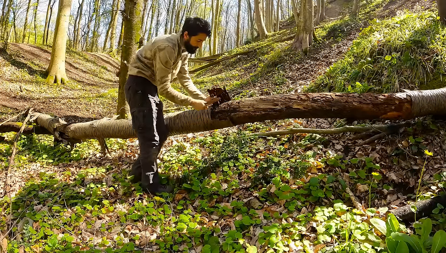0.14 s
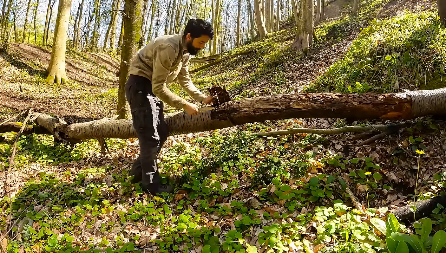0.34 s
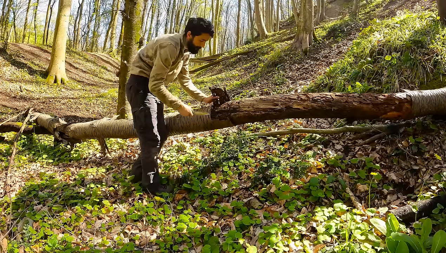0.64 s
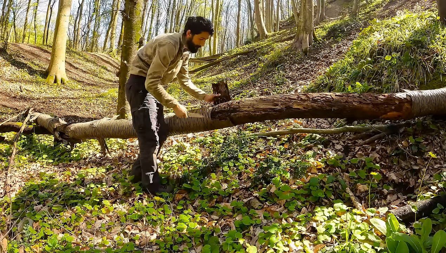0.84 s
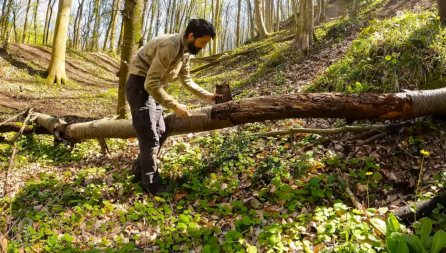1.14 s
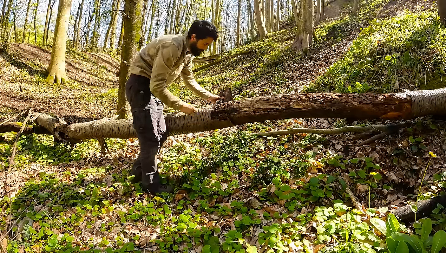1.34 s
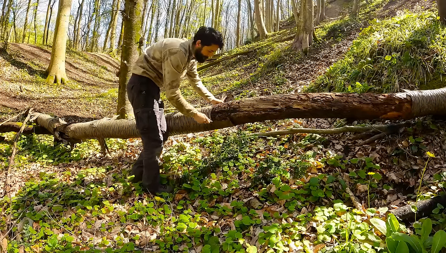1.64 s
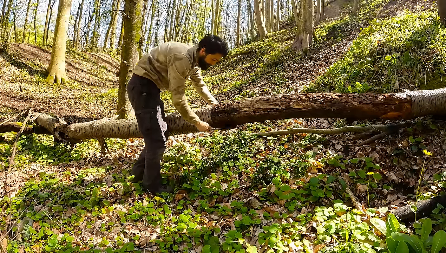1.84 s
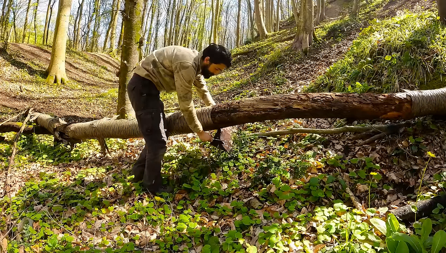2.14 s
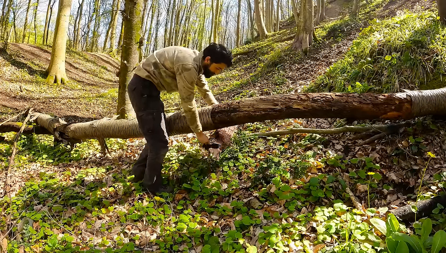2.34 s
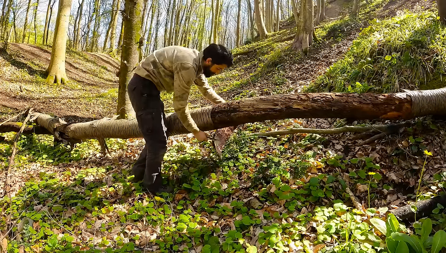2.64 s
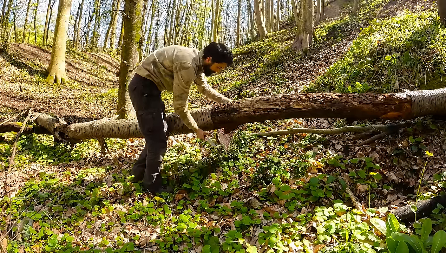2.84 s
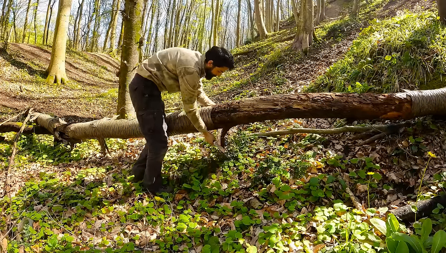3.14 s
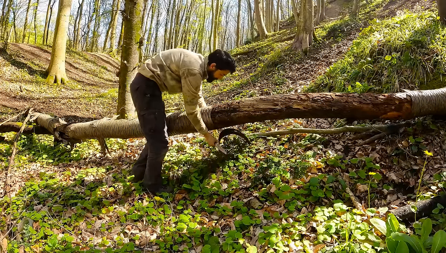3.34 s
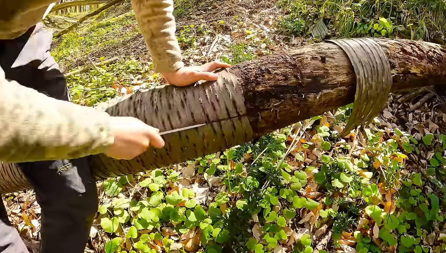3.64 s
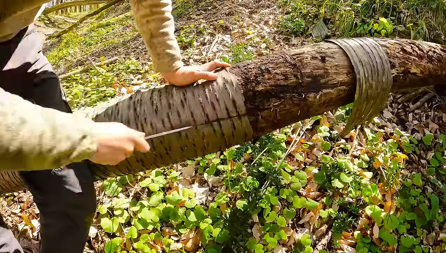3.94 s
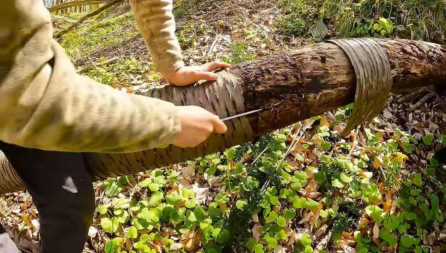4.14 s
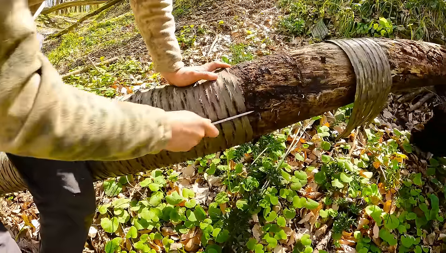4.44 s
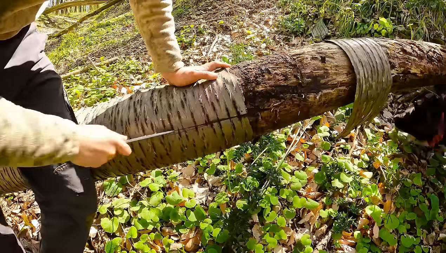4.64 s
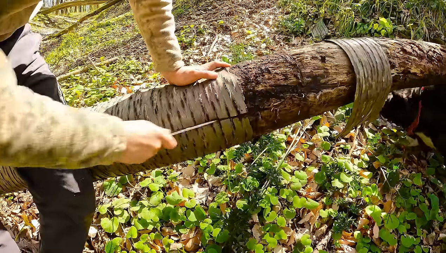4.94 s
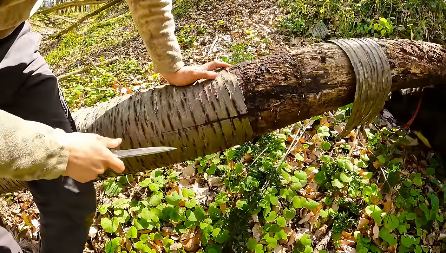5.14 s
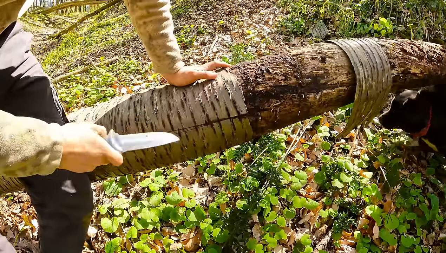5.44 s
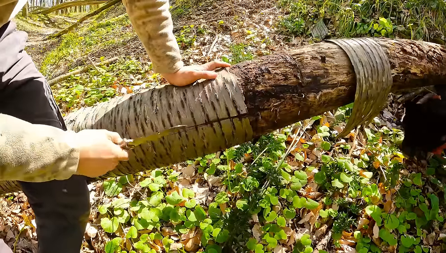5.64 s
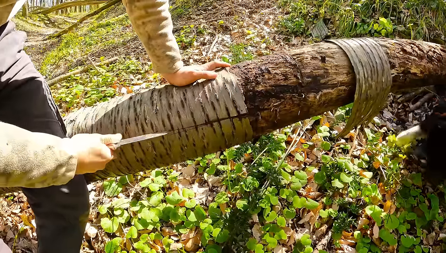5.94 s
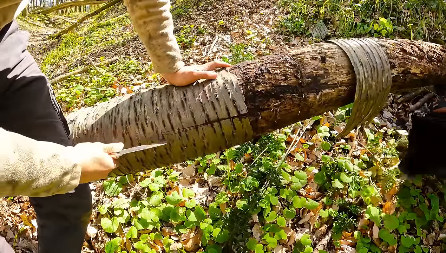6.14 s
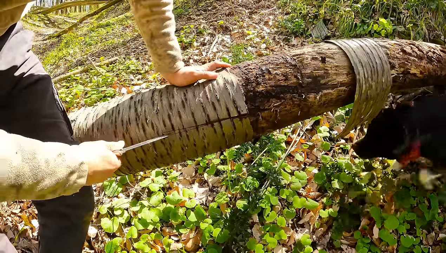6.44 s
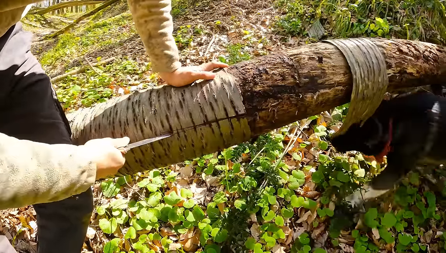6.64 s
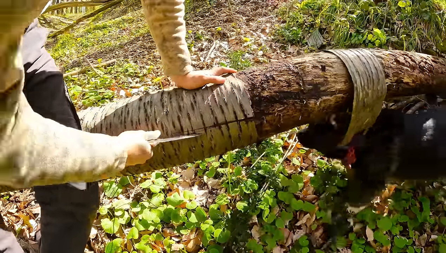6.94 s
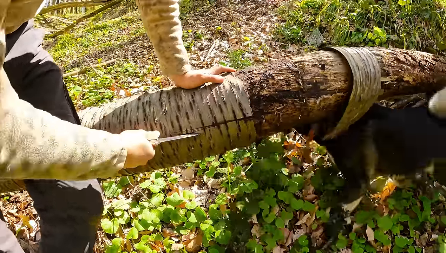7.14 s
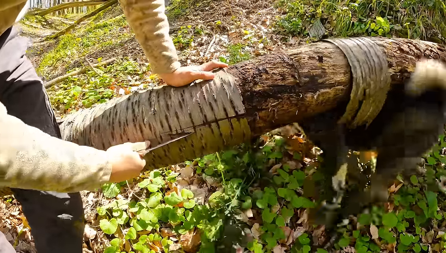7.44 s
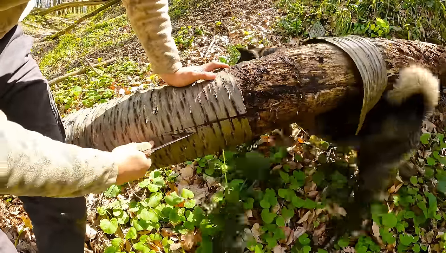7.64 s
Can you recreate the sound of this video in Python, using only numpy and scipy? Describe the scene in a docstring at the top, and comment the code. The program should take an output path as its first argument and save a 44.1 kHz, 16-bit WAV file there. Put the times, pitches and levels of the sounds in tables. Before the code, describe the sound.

In a quiet forest with faint air and a thin distant bird, a sheet of bark is peeled from a log in small tearing tugs, dry snaps and crumbly ticks. A knife then scores it with quick, close rasping strokes and sharp cracks. After a brief pause a dog trots through dry leaves, breaking twigs, bumps heavily beside the microphone, mostly on the right, and brushes softly under the log.

```python
"""In a quiet forest, a man peels a sheet of bark off a fallen log, then scores it with short knife strokes.
Tearing and rasping are clouds of tiny ringing fractures shaped by effort; snaps are sharp fronts with short rings.
A small bird sings faintly in gliding sine notes over a filtered-noise murmur of air.
A dog trots up through leaves of crushed grains and breaks twigs, bumps heavily near the microphone
and brushes under the log; low noise bands make the thuds and decaying sines the hard bumps."""
import sys
import numpy as np
from scipy import signal
from scipy.fft import rfft, irfft
from scipy.io import wavfile
from scipy.ndimage import map_coordinates

SR = 44100
rng = np.random.default_rng(int(sys.argv[2]) if len(sys.argv) > 2 else 0)


def unload_wav(signal):
    """Save mono or channel-first audio to the path in sys.argv[1] as 16-bit WAV at rate SR, clipped to [-1, 1]."""
    wavfile.write(
        sys.argv[1],
        SR,
        np.round(np.clip(np.atleast_2d(signal).T, -1, 1) * 32767).astype(np.int16),
    )


N = 343968

# leaves stirred as the dog comes nearer: (time [s], crunch [dB], fizz [dB])
LEAF_STIR = [(5.2, -74, -92), (5.5, -68.5, -69.5), (5.77, -61, -76), (5.92, -50.5, -71), (6.0, -55, -56),
             (6.1, -45.5, -48), (6.35, -42, -42.5), (6.47, -48, -50.5), (6.85, -39, -43.5),
             (7.02, -39, -44.5), (7.13, -52.5, -63), (7.4, -73, -48)]
# the dog brushing under the log: (time [s], crunch [dB], fizz [dB])
COAT_BRUSH = [(7.198, -51, -72), (7.32, -40.5, -57), (7.42, -35.5, -46.5), (7.48, -40.5, -55),
              (7.572, -35, -51), (7.66, -47, -60), (7.71, -41, -54), (7.8, -43, -59)]


def from_db(db):
    """Decibels to gain."""
    return 10 ** (np.asarray(db) / 20)


def unit(x):
    """Scales to rms 1."""
    return x / np.sqrt(np.mean(x ** 2) + 1e-20)


def read(points, hz):
    """Reads a table on a log-frequency axis."""
    f, value = np.transpose(points)
    return np.interp(np.log(hz + 1), np.log(f + 1), value)


def level_curve(s, db):
    """Gain over the whole scene from levels in dB at times s, all but silent outside them."""
    return from_db(np.interp(np.arange(N) / SR, s, db, -120, -120))


def add(mix, s, sound):
    """Adds a sound to the mix at time s."""
    part = mix[..., max(round(s * SR), 0):][..., :sound.shape[-1]]
    part += sound[..., :part.shape[-1]]


def band(x, lo_hz, hi_hz, order=2):
    """Causal band-pass."""
    edges = np.clip([lo_hz, max(hi_hz, lo_hz * 1.1)], 5, SR / 2 - 100)
    return signal.sosfilt(signal.butter(order, edges, "band", fs=SR, output="sos"), x)


def colour(x, tone):
    """Minimum-phase filter with the given spectrum, so that clicks keep their sharp fronts."""
    hz = abs(np.fft.fftfreq(2048, 1 / SR))
    log_gain = np.log(from_db(np.maximum(read(tone, hz), -90)))
    # the Hilbert transform of the log gain gives the minimum phase
    taps = np.fft.ifft(np.exp(np.conj(signal.hilbert(log_gain)))).real
    return signal.oaconvolve(x, taps[None], axes=1)[:, :N]


def wander(rate_hz):
    """Random drift of rms 1 through rate_hz random points a second."""
    knots = rng.standard_normal(N // 16)
    return unit(np.interp(np.arange(N) * rate_hz / SR, np.arange(len(knots)), knots))


def ports(pair, width_db):
    """Turns a direct and a scattered signal into left and right, their spread set by frequency."""
    # stereo width before width_db is added: (frequency [Hz], side against mid [dB])
    side_tilt = [(1300, -18.5), (3000, -13), (8000, -16.5), (10500, -12), (12200, -6), (15000, -12)]
    gain = from_db(width_db + read(side_tilt, np.fft.rfftfreq(N, 1 / SR)))
    side = irfft(rfft(pair[1]) * gain, N)
    return np.array([pair[0] + side, pair[0] - side])


def patchy(x, depth_db, per_s):
    """The point of contact keeps shifting, so resonances about a seventh of an octave wide come and go."""
    hz, t, spectrum = signal.stft(x, SR, nperseg=256)
    places = np.meshgrid(7 * np.log2(1 + hz / 700), t * per_s, indexing="ij")
    field = unit(map_coordinates(rng.standard_normal((40, 1024)), places, order=1, mode="wrap"))
    return signal.istft(spectrum * from_db(depth_db * field), SR, nperseg=256)[1][:, :N]


def fibres(per_s, spread_db, clump_db, hiss_db, patch_db):
    """Tiny fractures in clumps, each ringing a few cycles at its own size and pitch, over a fine sliding hiss."""
    grain_width = 1.42  # a grain's band reaches this factor above and below its pitch
    out = np.zeros((2, N))
    count = int(per_s * N / SR / 12)
    for hz in np.geomspace(700, 13000, num=12):
        when, chance, scatter, sign = rng.random((count, 4)).T
        size_db = spread_db * np.minimum(-np.log(1 - chance), 3)
        size = from_db(size_db) * np.sign(sign - .5)
        clicks = np.zeros((2, N))
        clicks[:, (when * N).astype(int)] = size, size * np.sign(scatter - .5)
        out += band(clicks, hz / grain_width, hz * grain_width, order=2) * hz ** -.15
    grains = unit(out) + from_db(hiss_db) * rng.standard_normal((2, N))
    clumps = from_db(clump_db * wander(130))
    return patchy(grains, patch_db, per_s=80) * clumps


def motion(rows, end, fizz_db, run_out, slowest_db):
    """Moves speed up in a bell, slow over run_out times their length and drag faintly around it."""
    # takes rows that start (time, effort dB, length), returns rows (time, crunch dB, fizz dB)
    t = np.arange(0, end, .004)
    s, effort_db, length = np.transpose(rows)[:3, :, None]
    u = (t - s) / np.maximum(length * np.where(t < s, 1, run_out), .003)
    speed = np.exp(-u ** 2 / 2) + from_db(slowest_db) * np.exp(-abs(u) / 2)
    columns = [t]
    for db in (effort_db, effort_db + fizz_db):
        power = np.sum((from_db(db) * speed) ** 2, axis=0)
        columns.append(10 * np.log10(power + 1e-12))
    return np.column_stack(columns)


def rub(effort, grains, tone, width_db):
    """Grains take the colour of the material; one effort curve sets the crunch, another the fizz above it."""
    s, crunch_db, fizz_db = np.transpose(effort)
    sound = colour(grains, tone)
    treble = 1 / (1 + (4500 / (np.fft.rfftfreq(N, 1 / SR) + 1)) ** 8)  # steep split at 4500 Hz
    fizz = irfft(rfft(sound) * treble, N)
    out = np.zeros((2, N))
    for part, db in ((sound - fizz, crunch_db), (fizz, fizz_db)):
        loudness = np.std(band(part[0], 700, 14000))
        out += part / loudness * level_curve(s, db)
    return ports(out, width_db)


def cracks(rows, ring, body_db, shell_db, chatter_db, chatter_t60, tail_db, lead_in_db, width_db):
    """A faint noise rises just before each crack, then a sharp front sets off a short ring and chatter."""
    # dry ring that all cracks share, before shell_db: (frequency [Hz], level [dB], 60 dB decay [s])
    shared_ring = [(1106, -4.5, 0.028), (2420, -3.5, 0.0083), (3570, -0.5, 0.015)]
    typical_hz, follow = 2200, 0.2  # usual centre of a front, and its share of the crack's own pitch
    lead = 512  # samples of rising noise ahead of the front
    t = np.arange(-lead, 8 * lead) / SR
    out = np.zeros((2, N))

    def dying(t60):
        """Decay by 60 dB in t60 seconds, from the front on."""
        return from_db(-60 * abs(t) / max(t60, .001)) * (t >= 0)

    shell = sum(from_db(shell_db + db) * np.sin(2 * np.pi * hz * t) * dying(t60)
                for hz, db, t60 in shared_ring)
    lead_in = from_db(lead_in_db) * np.exp(-abs(t) / .002) * (t < 0)
    chatter_fade = from_db(chatter_db) * dying(chatter_t60) + from_db(tail_db) * dying(0.059) + lead_in
    splinter_fade = dying(ring * 1.38) + 0.023 * dying(0.0094) + lead_in
    for s, db, hz, splinter_db in rows:
        noise = rng.standard_normal((2, 2, len(t)))
        centre = typical_hz * (hz / typical_hz) ** follow
        front = band(1. * (t == 0), centre / 1.79, centre * 1.62, order=4)
        body = (np.sin(2 * np.pi * hz * t) * dying(ring) + shell) * np.clip(2 * hz * t, 0, 1)
        crack = front / abs(front).max() + from_db(body_db) * body
        # the scattered signal is a quarter cycle out of step
        crack = np.array([crack, np.imag(signal.hilbert(crack))]) / abs(crack).max()
        crack += unit(band(noise[0], centre / 2.18, centre * 1.72, order=4)) * chatter_fade
        crack += from_db(splinter_db) * unit(band(noise[1], 5800, 9140, order=3)) * splinter_fade
        add(out, s + t[0], from_db(db) * crack)
    return ports(out, width_db)


def shudder(hz, length, spread, rise, fall):
    """A low noise band around hz that swells, holds for about length seconds and dies away."""
    t = np.arange(SR) / SR
    swell = (1 - np.exp(-t / rise)) / (1 + (t / abs(length)) ** fall)
    mid, side = band(rng.standard_normal((2, len(t))), hz / spread, hz * spread, order=2) * swell
    loudness = np.sqrt(np.sum(mid ** 2) / (abs(length) * SR))
    return np.array([mid + 0.05 * side, mid - 0.023 * side]) / loudness


def forest(width_db):
    """Still air among the trees: noise coloured to a low murmur of wind and a faint hiss, gently swaying."""
    # spectrum of the air: (frequency [Hz], relative level [dB])
    air_tone = [(15, -7), (28, 4.5), (110, -10.5), (230, -2.5), (420, -9.5), (600, -16.5), (1500, -21),
                (4000, -30), (5300, -48), (7200, -24.5), (10500, -30.5), (12300, -31), (15500, -52)]
    sway = from_db(.7 * wander(6))
    air = unit(colour(rng.standard_normal((2, N)), air_tone))
    return from_db(-62) * ports(air, width_db) * sway


def bird(dip_hz, sag_hz, settle_notes):
    """A far, thin song of repeated sine notes that dip and rise again; each phrase sinks and settles."""
    # phrases: (first note's middle [s], note rate [1/s], first note's lowest pitch [Hz], level [dB],
    # note length [s])
    phrases = [(.017, 10.6, 5720, -66.5, .052), (3.123, 11.7, 6080, -56.5, .036)]
    # how many notes each phrase has: (notes of the first, notes of the second)
    phrase_notes = (4, 6)
    out = np.zeros(N)
    for (s, per_s, hz, db, note_s), count in zip(phrases, phrase_notes):
        u = np.linspace(-1, 1, int(note_s * SR))
        for k in range(count):
            pitch = hz - sag_hz * (1 - np.exp(-k / settle_notes)) + dip_hz * u ** 2
            note = np.sqrt(1 - u ** 2) * np.sin(2 * np.pi * np.cumsum(pitch) / SR)
            add(out, s + k / per_s - note_s / 2, from_db(db) * note)
    return out


def thin_hiss(s, length, db, low_hz, high_hz):
    """A thin, high band of noise swells and fades in the pause after the cutting."""
    swell = np.exp(-((np.arange(N) / SR - s) / length) ** 2 / 2)
    hiss = unit(band(rng.standard_normal((2, N)), low_hz, high_hz, order=3))
    return from_db(db) * swell * ports(hiss, 3.5)


def thuds():
    """Soft heavy contacts of feet and of the dog: low noise bands that swell fast and die away."""
    # contacts: (time [s], level [dB], pitch [Hz], left against right [dB], length [s])
    contacts = [(1.44, -55.5, 45.3, -4, 0.06), (1.615, -57, 45, -7, 0.029), (3.291, -47, 42.8, -6, 0.034),
                (6.266, -43, 50, -5, 0.068), (6.503, -35, 77.6, -5.5, 0.074), (6.769, -18, 42.5, -2, 0.081),
                (6.822, -24.5, 122, 0, 0.052), (7.516, -29, 123, 1.5, 0.043), (7.673, -31.5, 129, 1, 0.03)]
    out = np.zeros((2, N))
    for s, db, hz, pan_db, length in contacts:
        gain = from_db(db + np.array([[pan_db], [-pan_db]]) / 2)
        add(out, s, gain * shudder(hz, length, spread=1.55, rise=0.002, fall=2.8))
    return out


def short_knocks():
    """Short knocks: brief noise bands around a low pitch, under snaps and under the dog's thud."""
    # knocks: (time [s], level [dB], pitch [Hz])
    knocks = [(1.019, -42, 282), (1.241, -45.5, 232), (4.933, -40, 223), (5.944, -38, 610),
              (6.503, -38.5, 218), (7.499, -31.5, 357), (7.703, -43, 620)]
    out = np.zeros((2, N))
    for s, db, hz in knocks:
        add(out, s, from_db(db) * shudder(hz, length=0.007, spread=1.86, rise=0.0008, fall=2.05))
    return out


def sheet_flexes():
    """The loose sheet of bark groans low as it bends: a noise band that dies slowly."""
    # bends: (time [s], level [dB])
    bends = [(1.973, -51.5), (2.382, -54)]
    out = np.zeros((2, N))
    for s, db in bends:
        add(out, s, from_db(db) * shudder(hz=227, length=0.073, spread=1.6, rise=0.002, fall=1.7))
    return out


def bumps(left_db):
    """Hard knocks ring the microphone's support in decaying sines, mostly on the right."""
    # hard bumps: (time [s], level [dB])
    hits = [(6.773, -11.5), (6.791, -6.5), (6.834, -5.5), (6.839, -3.5)]
    # ringing modes of the support: (frequency [Hz], relative level [dB], 60 dB decay [s])
    modes = [(70.7, 3, 0.4), (147, 1.5, 0.15), (254.3, 1.5, 0.19), (313, 5, 0.079), (480, 4, 0.074),
             (686, -2, 0.065), (1170, -3.5, 0.031)]
    out, t = np.zeros(N), np.arange(SR // 3) / SR
    ring = sum(from_db(db - 60 * t / t60) * np.sin(2 * np.pi * hz * t) for hz, db, t60 in modes)
    for s, db in hits:
        add(out, s, from_db(db) * ring / abs(ring).max())
    return out * from_db([[left_db], [0]])


def tread(low_hz, high_hz, db):
    """The dog's weight rumbles in the ground: low noise in step with the stirred leaves and the brushing."""
    stir = sum(level_curve(*np.transpose(curve)[:2]) for curve in (LEAF_STIR, COAT_BRUSH))
    rumble = unit(band(rng.standard_normal((2, N)), low_hz, high_hz, order=2))
    return from_db(db) * stir * ports(rumble, 0)


def dog():
    """Paws crush leaves that settle slowly, twigs break, the coat brushes under the log and the ground rumbles."""
    # paws landing in dry leaves: (time [s], effort [dB], length [s])
    paws = [(6.172, -33.5, 0.009), (6.264, -37, 0.0095), (6.506, -36, 0.0025), (6.642, -35, 0.01),
            (6.725, -35.5, 0.011)]
    # twigs breaking under the dog: (time [s], level [dB], pitch [Hz], splinters against the crack [dB])
    twig_breaks = [(5.9, -32, 1510, -11), (6.1655, -18.5, 3430, -8), (6.267, -18, 3630, -20),
                   (6.5026, -18.5, 3750, -3), (6.565, -27.5, 1780, -10), (6.6655, -16.5, 4100, -5),
                   (6.727, -16, 4230, -13), (6.9565, -22.5, 3300, 0), (6.96, -14.5, 1910, -19),
                   (6.9853, -25, 2800, -26), (6.989, -14, 2930, -15), (6.9938, -14, 1480, -29),
                   (7.0065, -15, 3120, -16), (7.0157, -15, 3270, -31), (7.0232, -12.5, 3000, -24),
                   (7.0407, -13, 1370, -33), (7.1866, -25, 1310, -28), (7.4991, -15, 2390, -35)]
    # spectrum of dry leaves: (frequency [Hz], relative level [dB])
    leaf_tone = [(88, -57), (150, 6.5), (225, 6.5), (381, -4), (1020, -0.5), (1570, 0.5), (3480, 0),
                 (7410, -9), (10700, -19.5), (12000, -17), (15500, -35)]
    # spectrum of the brushing coat: (frequency [Hz], relative level [dB])
    coat_tone = [(150, -79), (250, -3.5), (297, -6), (490, -7), (978, -10), (1270, -6.5), (1760, -9),
                 (2900, -6), (3630, -7), (8470, -27), (10800, -31), (12200, -15), (15500, -30)]
    trotting = motion(paws, end=7.4, fizz_db=0.0, run_out=4.7, slowest_db=-34.0)
    crushed = fibres(per_s=3000, spread_db=2.5, clump_db=2.0, hiss_db=-2.5, patch_db=1.5)
    steps = rub(trotting, crushed, leaf_tone, width_db=7.5)
    loose = fibres(per_s=2600, spread_db=0.5, clump_db=2.0, hiss_db=3.5, patch_db=2.0)
    stirred = rub(LEAF_STIR, loose, leaf_tone, width_db=5.5)
    hairs = fibres(per_s=3800, spread_db=-2.5, clump_db=1.5, hiss_db=2.0, patch_db=0.4)
    brush = rub(COAT_BRUSH, hairs, coat_tone, width_db=-33)
    twigs = cracks(twig_breaks, ring=0.0047, body_db=7.5, shell_db=-31.0, chatter_db=-16.0,
                   chatter_t60=0.014, tail_db=-23, lead_in_db=-11, width_db=-0.5)
    leaves = (steps + stirred) * from_db([[-1], [1]])
    return leaves + brush + twigs + tread(low_hz=27.4, high_hz=178, db=-9.0)


def strands(width_hz):
    """A strand's ring glides as its free length changes; tearing fibres keep it going."""
    # unzipping: (time [s], length [s], first pitch [Hz], last pitch [Hz], level [dB])
    glides = [(4.179, 0.039, 1400, 7100, -46), (4.339, 0.057, 3160, 1260, -43),
              (4.537, 0.035, 1900, 7260, -36.5), (4.757, 0.084, 3260, 8050, -44.5)]
    out = np.zeros((2, N))
    for s, length, first_hz, last_hz, db in glides:
        u = np.linspace(0, 1, int(length * SR))
        turn = np.exp(2j * np.pi * np.cumsum(first_hz * (last_hz / first_hz) ** u) / SR)
        kicks = rng.standard_normal((2, len(u))) ** 3  # cubing makes the noise spiky
        # shift the glide down to 0 Hz, keep a narrow band, shift it back
        lowpass = signal.butter(2, width_hz / 2, fs=SR, output="sos")
        ring = signal.sosfilt(lowpass, kicks / turn)
        add(out, s, from_db(db) * np.sin(np.pi * u) * unit((ring * turn).real))
    return ports(out, 0)


def knife():
    """The blade rasps to and fro through the fibres, unzips strands and now and then breaks through."""
    # strokes: (fastest point [s], effort [dB], length [s], fizz against the effort [dB])
    strokes = [(3.712, -37.5, 0.031, -8), (3.878, -43, 0.059, -11), (4.045, -40, 0.036, -8),
               (4.202, -39.5, 0.041, -10), (4.364, -37.5, 0.044, -12.5), (4.543, -38.5, 0.047, -8),
               (4.703, -40.5, 0.054, -9), (4.829, -40, 0.061, -2), (4.913, -36.5, 0.047, -9),
               (5.092, -38, 0.049, -9.5)]
    # the blade stays in the cut and drags between strokes: same columns as the strokes
    drag = (4.5, -57, 0.45, -1.5)
    # the blade breaking through: (time [s], level [dB], pitch [Hz], splinters against the crack [dB])
    breaks = [(3.647, -28.5, 1420, -15.5), (3.6926, -22, 1540, -17), (3.699, -16.5, 1850, -23),
              (3.7207, -24, 1630, -28), (3.8054, -13.5, 2880, -29), (3.879, -23.5, 2100, -33),
              (4.004, -26, 2030, -14), (4.061, -27, 1830, -26), (4.1495, -28.5, 1500, -8.5),
              (4.191, -27, 1540, -32), (4.28, -33, 1880, -7), (4.333, -27.5, 1600, -9.5),
              (4.3397, -25, 1750, -16), (4.493, -25, 1520, -28), (4.508, -28, 2470, -25),
              (4.5941, -12.5, 2100, -26), (4.622, -20, 2610, -16), (4.6744, -24, 1980, -13),
              (4.8495, -17, 1750, -30), (4.9374, -10, 1840, -23), (5.021, -20, 2200, -30),
              (5.0254, -11.5, 1700, -22), (5.224, -41, 970, -12), (5.464, -39, 3700, 4)]
    # spectrum of the rasp: (frequency [Hz], relative level [dB])
    rasp_tone = [(130, -5.5), (210, 4), (307, -5), (670, -12.5), (923, -5), (1750, -1), (2230, -2),
                 (3190, -5), (7100, -15.5), (10400, -28), (12200, -24), (15500, -43)]
    moves = [*strokes, drag]
    cutting = motion(moves, end=5.5, fizz_db=np.array(moves)[:, 3:], run_out=0.64, slowest_db=-18.0)
    grit = fibres(per_s=2600, spread_db=5.0, clump_db=1.0, hiss_db=-4, patch_db=3.2)
    rasp = rub(cutting, grit, rasp_tone, width_db=3.5)
    snapping = cracks(breaks, ring=0.0072, body_db=-1.0, shell_db=-33, chatter_db=-18.5,
                      chatter_t60=0.02, tail_db=-53, lead_in_db=-19, width_db=3.5)
    return rasp + strands(width_hz=980) + snapping


def crumbs(pulling, level_db, follow, spread_db, low_hz, octaves, splinter_db):
    """Crumbs of bark tick off at random while it is peeled, louder under a hard pull; gives rows for cracks."""
    count = 36
    when, size, pitch = rng.random((count, 3)).T
    s = pulling[-1, 0] * (np.arange(count) + when) / count
    slack_db = np.interp(s, pulling[:, 0], pulling[:, 1] - pulling[:, 1].max())
    db = level_db + follow * slack_db - spread_db * size
    return np.column_stack([s, db, low_hz * 2 ** (octaves * pitch), np.full(count, splinter_db)])


def peeling():
    """The sheet tears loose tug by tug; it snaps, and sheds crumbs."""
    # tugs at the bark: (fastest point [s], effort [dB], length [s], fizz against the effort [dB])
    pulls = [(-0.02, -53.5, 0.017, 5), (0.33, -65.5, 0.26, -1.5), (0.615, -54, 0.055, -2),
             (0.707, -46.5, 0.02, -2.5), (0.779, -55, 0.023, -5.5), (1.81, -62, 0.059, -1),
             (1.988, -48.5, 0.0052, -7.5), (2.055, -57.5, 0.061, -2.5), (2.333, -46.5, 0.014, -1.5),
             (2.43, -50, 0.084, -4.5), (2.72, -50.5, 0.054, -5), (2.795, -53, 0.072, 1.5),
             (3.03, -56.5, 0.038, -2), (3.22, -53, 0.091, -2.5), (3.36, -58, 0.029, 4.5),
             (3.5, -52, 0.069, -4.5), (3.578, -46, 0.015, -5)]
    # bark snapping in the hands: (time [s], level [dB], pitch [Hz], splinters against the crack [dB])
    snaps = [(0.0474, -28.5, 1390, -12.5), (0.0974, -30.5, 2920, -12.5), (0.2497, -35.5, 3020, -7.5),
             (0.443, -40.5, 3970, -11), (1.0211, -26.5, 1420, -6.5), (1.054, -39, 1890, -6.5),
             (1.0923, -44.5, 2380, -9), (1.2412, -29, 1790, -21), (1.403, -36.5, 1170, -22),
             (1.426, -40.5, 1300, -12), (1.801, -39, 1220, -6), (1.826, -47, 1500, -0.5),
             (2.042, -37, 930, -11), (2.072, -27, 950, -20), (2.153, -44.5, 2190, 1.5),
             (2.181, -27, 2250, -22), (2.19, -20.5, 2020, -23.5), (2.416, -30, 2350, -22),
             (2.435, -21.5, 2700, -35), (2.445, -26, 2050, -31), (2.474, -39.5, 1350, -4),
             (2.642, -33, 1380, -24), (2.682, -33, 1520, -26), (2.994, -33, 850, -24)]
    # spectrum of tearing bark: (frequency [Hz], relative level [dB])
    bark_tone = [(150, -8), (600, -8), (850, -9), (1200, -0.5), (2000, -5), (3800, -6.5), (5200, -18),
                 (7300, -13.5), (8400, -21.5), (10500, -24.5), (12200, -28.5), (15500, -46)]
    # a faint, duller crackle swells around every snap: length 0.021 s, 36 dB below the snap's level
    swells = [(s, db - 36, 0.021, -6) for s, db, _, _ in snaps]
    tugs = [*pulls, *swells]
    pulling = motion(tugs, end=3.62, fizz_db=np.array(tugs)[:, 3:], run_out=1.26, slowest_db=-9.5)
    torn = fibres(per_s=1300, spread_db=4, clump_db=1.5, hiss_db=4.0, patch_db=1.5)
    tearing = rub(pulling, torn, bark_tone, width_db=8.0)
    ticks = crumbs(pulling, level_db=-41.5, follow=0.32, spread_db=4, low_hz=1090, octaves=1.96,
                   splinter_db=-3.0)
    snapping = cracks([*snaps, *ticks], ring=0.014, body_db=0.5, shell_db=-8.0, chatter_db=-15.0,
                      chatter_t60=0.036, tail_db=-34, lead_in_db=-36, width_db=5.5)
    return tearing + snapping


def scene():
    """Peeling a little to the right, then cutting, then the dog, in the forest."""
    far = forest(width_db=10.0) + bird(dip_hz=1230, sag_hz=726, settle_notes=2.14)
    far += thin_hiss(s=6.01, length=0.35, db=-61.0, low_hz=6060, high_hz=7600)
    low_contacts = thuds() + short_knocks() + sheet_flexes() + bumps(left_db=-18.0)
    bark = peeling() * from_db([[-.6], [.5]])
    return far + low_contacts + dog() + knife() + bark


def record(dry):
    """The right channel is a little stronger, the left brighter at the very top; steep limit at 15.9 kHz."""
    lowpass = signal.firwin(511, 15900, window=("kaiser", 9), fs=SR)
    top = band(dry, 11000, 16800, order=1)
    heard = dry * from_db([[-.2], [.2]]) + top * np.array([[.25], [-.25]])
    return signal.oaconvolve(heard, lowpass[None], "same")


dry = scene()
out = record(dry)
unload_wav(out)
```